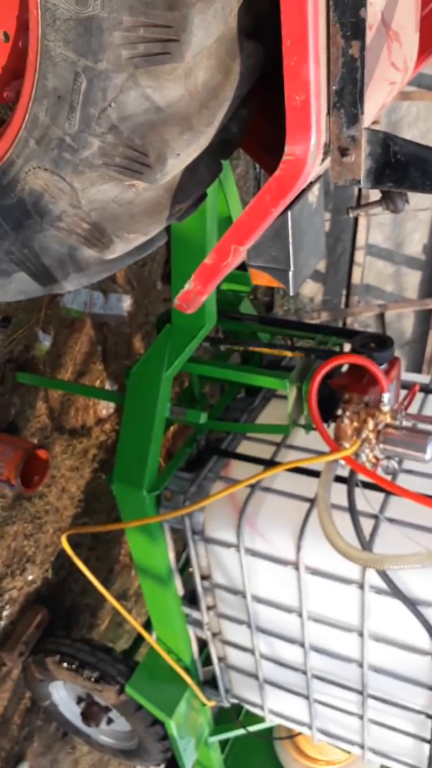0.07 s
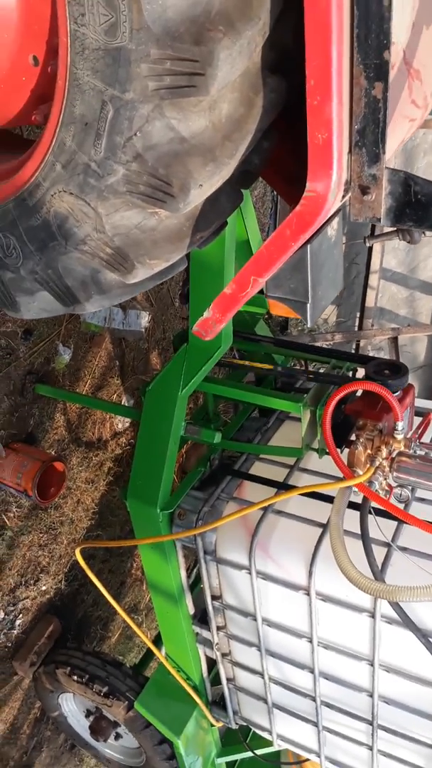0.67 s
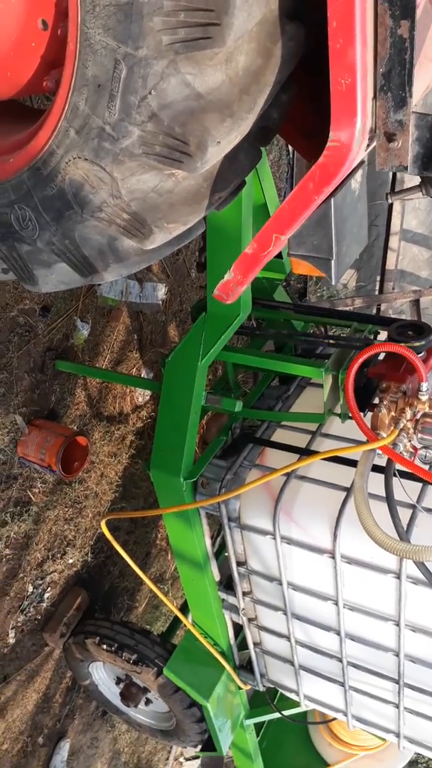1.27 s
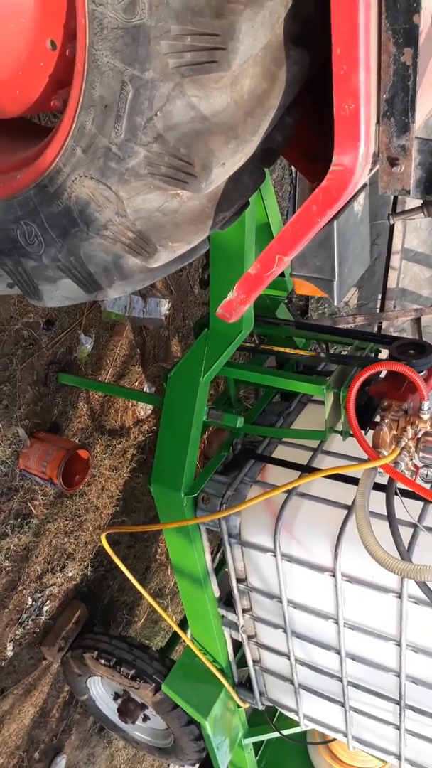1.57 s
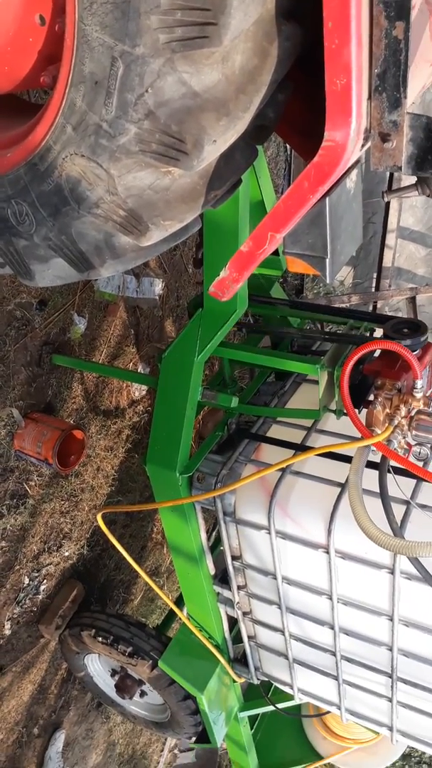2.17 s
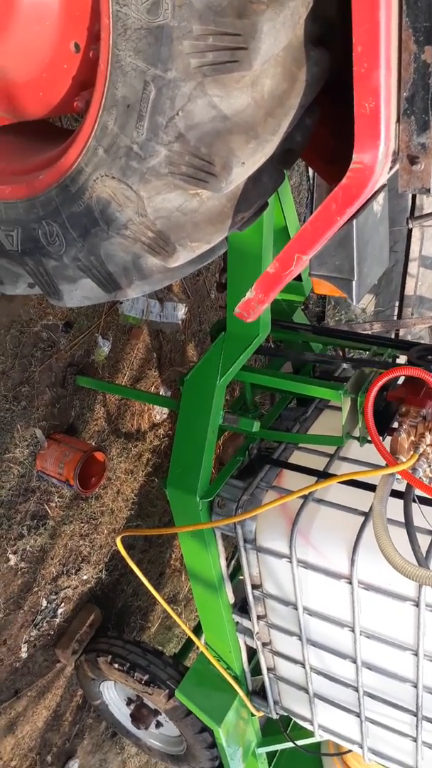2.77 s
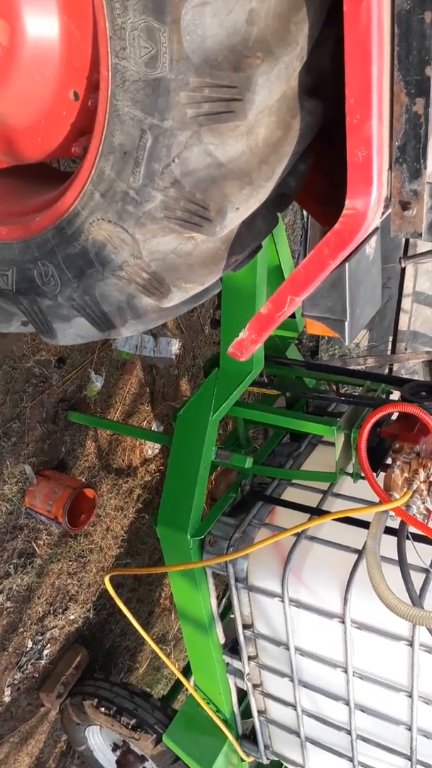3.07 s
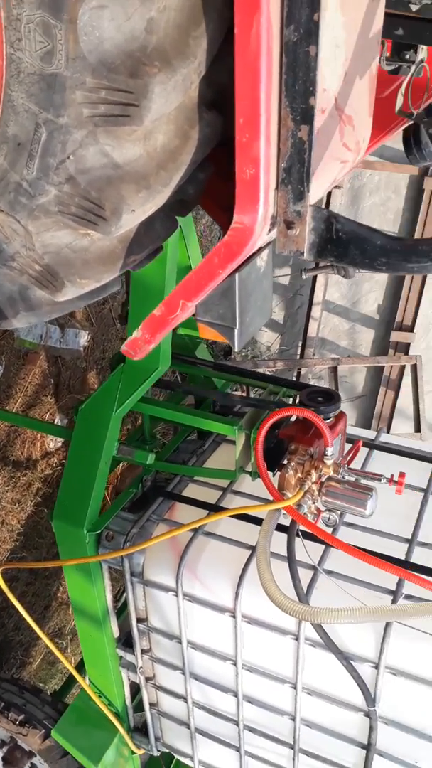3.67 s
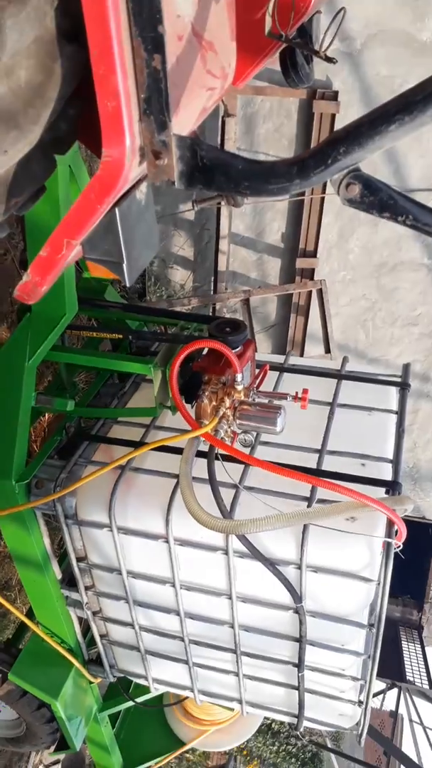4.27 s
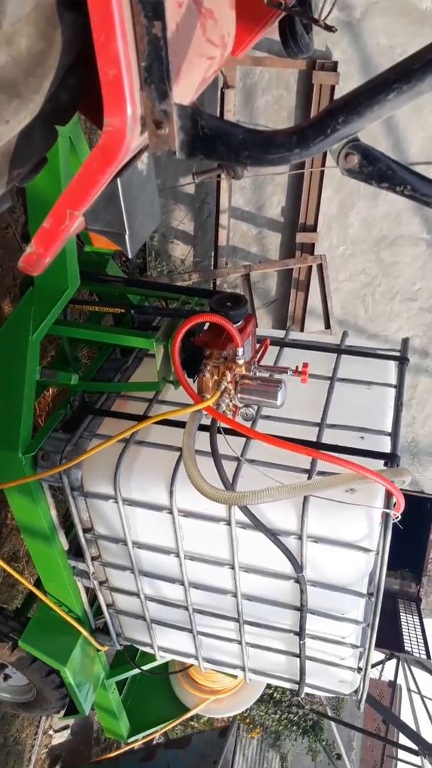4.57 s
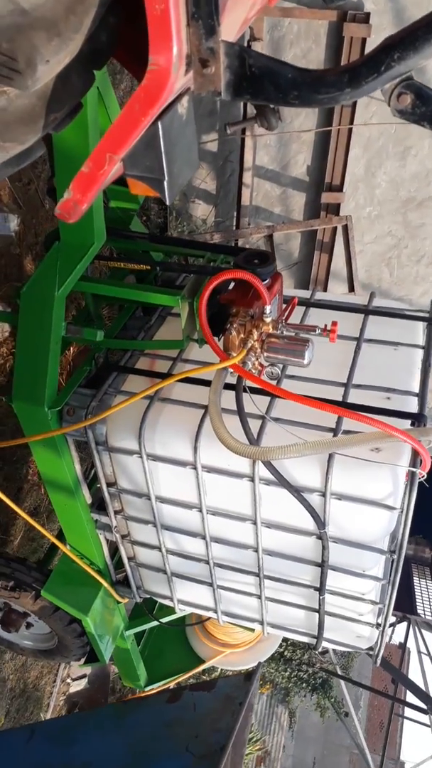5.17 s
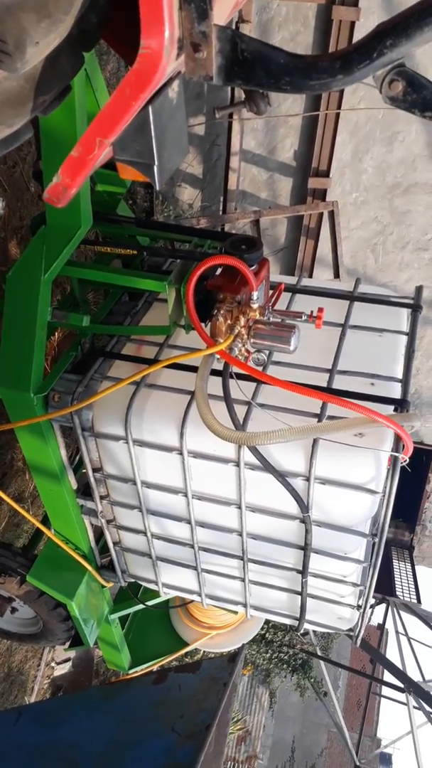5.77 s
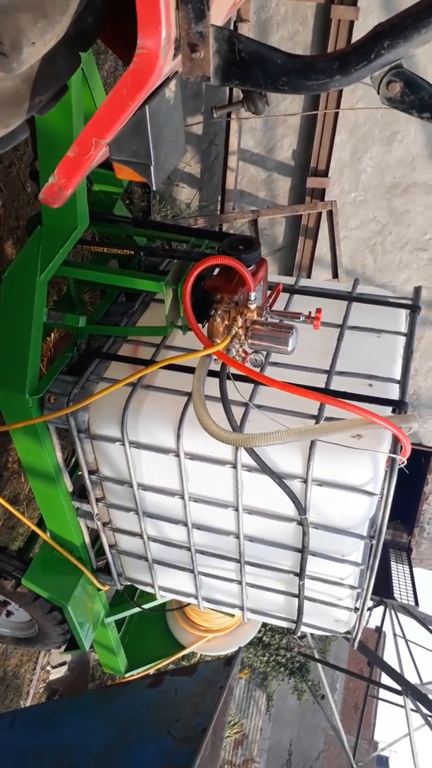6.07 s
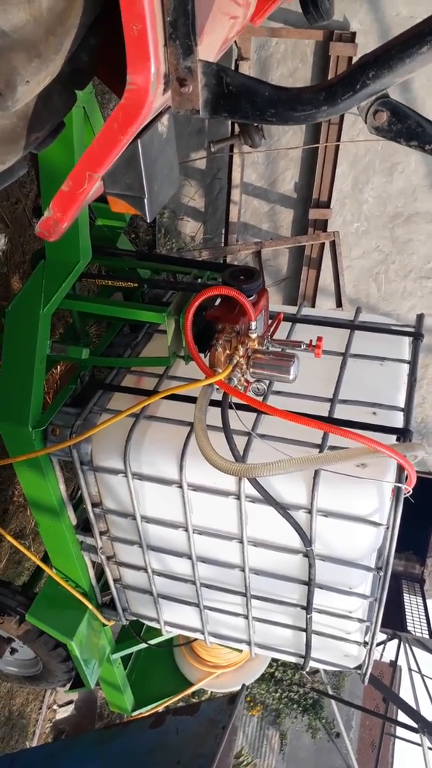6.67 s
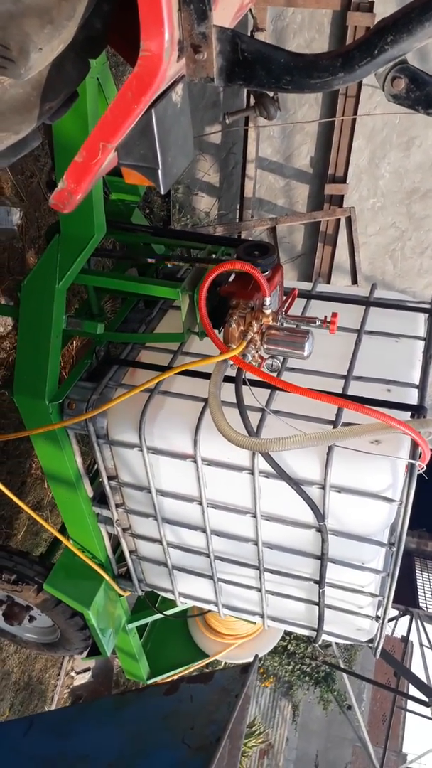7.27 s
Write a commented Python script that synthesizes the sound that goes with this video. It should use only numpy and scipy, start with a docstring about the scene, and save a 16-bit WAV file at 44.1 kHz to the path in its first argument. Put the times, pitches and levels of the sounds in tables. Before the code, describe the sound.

Fast, shrill, rhythmic squeaks and dull knocks over a clattering tractor engine; the squeaking drops out, the engine swells, and it starts again.

```python
"""A three-cylinder tractor diesel runs fast and drives a sprayer pump, heard from close by in a yard.
A dry spot in the pump drive rubs once a turn, ten times a second: a falling chirp, a lower squeak, a rasp, often a dull knock.
The rubbing stops for a while; the recorder's gain control then lets the engine swell until the chirps return."""
import sys
import numpy as np
from scipy import signal
from scipy.fft import rfft, irfft, next_fast_len
from scipy.io import wavfile
from scipy.ndimage import uniform_filter1d, minimum_filter1d

SR = 44100
rng = np.random.default_rng(int(sys.argv[2]) if len(sys.argv) > 2 else 0)


def to_wav(s):
    """Save 16-bit WAV."""
    ch = np.atleast_2d(s).T  # columns
    pcm = np.round(np.clip(ch, -1, 1) * 32767)  # PCM
    wavfile.write(sys.argv[1], SR, pcm.astype(np.int16))


N = 323253

# partials of the stick-slip: (multiple of the chirp pitch, dB, delay s, phase wobble rad); the slip doubles its period unsteadily
PARTIALS = [(1 / 2, -7.5, 0.0035, 0.8), (1, 0, 0.001, 0.3), (3 / 2, -14, 0.005, 0.6), (2, -18.3, 0.001, 1), (5 / 2, -23.5, 0.0027, 1.6)]   # fixed
# long irregular squeaks as the rubbing lets go or catches again: (s, length s, start Hz, end Hz, dB, rasp dB)
SQUEAKS = [(2.984, 0.025, 4230, 3940, 3, -0.5), (3.994, 0.023, 5930, 5530, 5, -30), (4.03, 0.031, 6174, 5720, -4, -36), (6.755, 0.049, 6020, 5450, -15, -39), (6.804, 0.0173, 4210, 4380, -10.5, -18), (6.826, 0.0258, 5410, 4280, -5, -3), (6.854, 0.0152, 3090, 3200, 5, -10.5)]
# resonances that the rasp excites: (Hz, width Hz, dB, age at the top s, spread s)
RASP = [(1206, 300, -12, 0.07, 0.0081), (1830.6, 140, 0, 0.0676, 0.00895), (2130, 330, -5, 0.072, 0.018), (2630, 240, -1.5, 0.069, 0.014), (2596, 520, -2.5, 0.024, 0.011), (3250, 430, -3.5, .056, 0.017), (3940, 250, -6.5, 0.0557, 0.0159), (4373, 460, -5.5, 0.055, 0.01615), (5190, 390, -8.5, 0.049, 0.018), (6200, 710, -7.5, 0.021, 0.016), (7840, 1500, -7.5, 0.055, .013), (12200, 1600, -23, 0.058, 0.009)]
# hiss of the rubbing: (Hz, dB per Hz)
HISS = [(600, -9.5), (1200, -1.5), (1500, 3.5), (2800, -2), (6000, -7.5), (9200, -15), (10100, -47), (14000, -25), (16000, -32)]
# the hardest knocks of the drive: (s, peak dB, pitch Hz)
KNOCKS = [(0.574, -15.5, 186), (0.774, -11.5, 290), (0.866, -11, 270), (0.967, -9, 205), (1.151, -14, 371),
          (2.108, -12, 143), (2.477, -11.5, 127), (2.674, -12.5, 162), (2.768, -11.5, 110), (2.869, -11.5, 350),
          (3.433, -14, 127), (3.539, -8, 151), (3.924, -11, 255), (6.987, -9, 296)]
# engine: (s, firings per s)
SPEED = [(0, 36.6), (5.9, 36.63), (6.6, 36.3), (7.33, 36.5)]   # fixed
# exhaust note: (multiple of the firing rate, dB rms)
EXHAUST = [(1, -55), (2, -37), (3, -26.5), (4, -39), (5, -29.5), (7, -28.5), (8, -38), (9, -42)]   # fixed
# gear and accessory whines at mean speed: (Hz, dB rms)
WHINES = [(495.3, -32.5), (576.0, -33), (818.3, -36.5), (990.5, -37), (1357, -45), (1540, -39), (1577, -33),
          (1841, -56), (2013, -33)]
# combustion clatter: (Hz, dB per Hz)
CLATTER = [(300, -1), (550, -4.5), (850, -4), (1100, -0.5), (1350, 2), (2050, -1.5), (2800, -9), (3800, -19.5), (6000, -23), (8600, -22), (10800, -51.5), (12300, -48), (12700, -36), (16000, -38)]
# rumble of block and frame: (Hz, dB per Hz)
RUMBLE = [(25, -28), (50, -25), (75, -11.5), (120, 0.5), (220, 0), (310, 4.5), (430, -1.5), (600, 2), (1000, -18), (2500, -39.5)]
STRONG_FIRING_S = 5.507   # fixed
CUTOFF_HZ = 15720   # fixed
T = np.arange(N) / SR
TURNS_PER_S = 10.487   # fixed
# spells in which the dry spot rubs on every turn: (first rub s, until s, chirp dB, rasp dB)
SPELLS = [(-0.002, 2.9, 9.8, 4), (3.05, 3.9673, 9, 3.5), (4.02, 4.07, 1.5, -27), (6.888, 7.32, 8.2, 3.6)]
# how the dry spot grips as time goes by: (s, settled chirp pitch Hz, fall of the chirp Hz, lead-in squeak dB, low squeak Hz, low squeak dB)
GRIP = [(0, 6096, 336.3, -22, 3510, -4.5), (0.9, 6103, 362, -14, 3500, -5), (1.45, 5950, 525, -0.5, 3904, -9), (1.8, 5970, 435, -4, 4164, -7.5),
        (2.05, 5930, 481.3, -14, 4180, -2.5), (2.8, 5866, 540, -17, 4011, -3), (3.15, 5976, 401, -19.5, 4110, 1.5), (3.9, 5764, 501, -16, 4193, 1),
        (6.9, 5817, 397, -16, 4470, -12), (7.3, 5900, 370.6, -15, 4500, -3.5)]
# every chirp swells, holds with a slight sag, drops as the grip breaks and then fades
ATTACK_S, ATTACK_DB_PER_S = 0.0021, 3300
HOLD_S, SAG_DB_PER_S = 0.027, 138
BREAK_S, BREAK_DB, FADE_DB_PER_S = 0.0092, 3, 299.5
GLIDE_S = 0.01474   # time in which the pitch settles
# shudder of the frame under the rubbing: (Hz, dB per Hz)
SHUDDER = [(30, -26), (55, -10), (80, 2.5), (130, 5), (250, 1), (600, 1), (900, -5.5), (1500, -1), (2500, -21.5)]


def from_db(db):
    """Decibels to gain."""
    return 10 ** (np.asarray(db) / 20)


def rms_one(x):
    """Scale to unit rms."""
    return x / np.sqrt(np.mean(x ** 2) + 1e-20)


def drift(rate, size=N):
    """Smooth chance of spread 1 that changes about rate times a second."""
    steps = np.arange(size) / SR * rate
    return 1.473 * np.interp(steps, np.arange(size // 8 + 2), rng.standard_normal(size // 8 + 2))


def colour(x, spectrum):
    """Give x a spectrum; rms 1."""
    hz, db = np.transpose(spectrum)
    size = next_fast_len(N)
    bins = np.maximum(np.arange(size // 2 + 1) * SR / size, 1)
    return rms_one(irfft(rfft(x, size) * from_db(np.interp(np.log(bins), np.log(hz), db, left=-60)), size)[:N])


def band(x, hz, width_hz):
    """A steep resonance."""
    edges = np.clip([hz - width_hz / 2, hz + width_hz / 2], 20, .45 * SR)  # fixed
    return signal.sosfilt(signal.butter(2, edges, "band", fs=SR, output="sos"), x)


def add(out, start_s, sound):
    """Mix a sound in at a time."""
    at = int(round(start_s * SR))
    sound = sound[max(-at, 0):N - at]
    out[max(at, 0):max(at, 0) + len(sound)] += sound


def swell(s, spread):
    """A bell-shaped rise and fall around a moment."""
    return np.exp(-.5 * (s / spread) ** 2)


def slip_phase(hz, jitter):
    """Phase of a stick-slip vibration whose pitch trembles with the grip."""
    tremble = .5 * drift(260, size=len(hz)) + drift(2200, size=len(hz))  # fixed
    return 2 * np.pi * (np.cumsum(hz * (1 + jitter * tremble)) / SR + rng.random())


def squeak(length, start_hz, end_hz, jitter, octave_db=-19, stutter_db=2.5):
    """A short rough glide with a weak octave; the grip stutters."""
    size = int(length * SR)
    phase = slip_phase(np.linspace(start_hz, end_hz, size), jitter)
    grip = signal.windows.tukey(size, .4) * rms_one(from_db(stutter_db * (drift(185.2, size=size) + .5 * drift(910, size=size))))
    return np.sqrt(2) * grip * (np.sin(phase) + from_db(octave_db) * np.sin(2 * phase))


def chirps(rubs, chirp_db=0.52, jitter=0.01, flutter_db=2.5, lead_db=-2, low_db=-1, low_fall=0.0602, groan_db=-0.8):
    """Each rub: a lead-in, a loud falling chirp, then drops to lower, rougher modes as the grip fades."""
    out, age = np.zeros(N), np.arange(-SR // 160, SR // 12) / SR
    for s, db, settled_hz, fall_hz, lead, low_hz, low, rasp_db in rubs:
        phase = slip_phase(settled_hz + fall_hz * np.exp(-np.maximum(age - ATTACK_S, 0) / GLIDE_S), jitter)
        for multiple, partial_db, delay, wobble in PARTIALS:
            level = db + chirp_db + partial_db + chirp_course(age - delay) + flutter_db * drift(242, size=len(age))
            add(out, s + age[0], np.sqrt(2) * from_db(level) * np.sin(multiple * phase + wobble * drift(401.0, size=len(age))))
        add(out, s - .012, from_db(db + lead + lead_db) * squeak(0.015, 5550, 5687, jitter=0.035))
        low_mode, groan_mode = 1 + 0.0405 * rng.standard_normal(2)
        add(out, s + .038, from_db(rasp_db + low + low_db) * squeak(0.0274, low_hz * low_mode * (1 + low_fall), low_hz * low_mode * (1 - low_fall), jitter=0.021))
        add(out, s + rng.uniform(.05, .062), from_db(rasp_db + groan_db) * squeak(0.0215, 3500 * groan_mode, 2400 * groan_mode, jitter=0.024))
    for s, length, start_hz, end_hz, db, _ in SQUEAKS:
        add(out, s, from_db(db) * squeak(length, start_hz, end_hz, jitter=.021))  # fixed
    return out


def rubbing(rubs, top_s, spread_s):
    """Strength of the dry sliding that follows every squeal, with its top at a given age."""
    out, age = np.zeros(N), np.arange(SR // 8) / SR
    for s, *_, db in rubs:
        add(out, s, from_db(db) * swell(age - top_s, spread_s))
    for s, length, *_, db in SQUEAKS:
        add(out, s, from_db(db) * swell(age - length + 0.057 - top_s, spread_s))
    return out


def rasp(rubs, grain_db=2.5, hiss_db=-8):
    """Uneven micro-slips shake the resonances of the drive and hiss."""
    grain = rms_one(from_db(grain_db * drift(420)))
    out = from_db(hiss_db) * rubbing(rubs, 0.044, 0.0326) * colour(grain * rng.standard_normal(N), HISS)
    for hz, width_hz, db, top_s, spread_s in RASP:
        out += from_db(db) * rubbing(rubs, top_s, spread_s) * rms_one(band(grain * rng.standard_normal(N), hz, width_hz))
    return out


def knocks(rubs, knock_db=17.7, light_hz=170, decay_s=0.0058, light_db=-11, clack_db=-3, clack_hz=450, clack_s=0.0046):
    """Heavily damped thuds with a short clack; every rub also jolts the frame lightly, twice."""
    out, age = np.zeros(N), np.arange(SR // 25) / SR
    jolts = [(s + lag_s + rng.normal(0, 0.002), db + light_db + rng.normal(0, 3.06), light_hz * np.exp(0.38 * rng.standard_normal()))
             for s, db, *_ in rubs for lag_s in (0.009, 0.021)]
    for s, db, hz in [(s, db + knock_db, hz) for s, db, hz in KNOCKS] + jolts:
        thud = np.sin(2 * np.pi * hz * age) * np.exp(-age / decay_s)
        clack = rms_one(band(rng.standard_normal(len(age)), clack_hz, clack_hz * 1.35)) * np.exp(-age / clack_s)
        add(out, s, from_db(db) * (thud + from_db(clack_db) * clack))
    return signal.sosfilt(signal.butter(2, 65, "high", fs=SR, output="sos"), out)


def engine(clatter_db=-18.5, rumble_db=-24, whine_db=-.5, between=0.4, ring_s=0.0051, rise_s=0.0037, throb=0.22, waver_db=0.3):
    """Three cylinders fire in turn, each with its own knock, over the exhaust note and gear whine."""
    rate = np.interp(T, *np.transpose(SPEED))
    firings = np.cumsum(rate) / SR
    firings = firings - np.interp(STRONG_FIRING_S, T, firings)
    age = firings % 1 / rate
    cylinder = from_db([5.5, 4.5, 0.5])[np.floor(firings).astype(int) % 3]  # fixed
    blows = between + cylinder * (1 - np.exp(-age / rise_s)) * np.exp(-age / ring_s)
    # much of the rattle comes back alike in every engine cycle, the rumble more than the clatter
    size = SR // 12
    place = (firings / 3 % 1 * size).astype(int) % size  # fixed
    alike = np.array([[.5], [.65]])  # fixed
    rattle = np.sqrt(alike) * rng.standard_normal((2, size))[:, place] + np.sqrt(1 - alike) * rng.standard_normal((2, N))
    out = from_db(clatter_db) * colour(blows * rattle[0], CLATTER) + from_db(rumble_db) * colour(blows ** throb * rattle[1], RUMBLE)
    tones = [(round(k), db) for k, db in EXHAUST] + [(hz / rate.mean(), db + whine_db) for hz, db in WHINES]
    for multiple, db in tones:
        out += np.sqrt(2) * from_db(db + waver_db * drift(14)) * np.sin(2 * np.pi * (multiple * firings + rng.random()))
    return out


def yard(x, echo_db=-22, fade_s=0.04):
    """Short echoes from tyre, tank, ground and walls."""
    out = x.copy()
    for lag in rng.uniform(.003, .11, size=60):
        add(out, lag, x * (from_db(echo_db) * np.exp(-lag / fade_s) * rng.choice([-1, 1])))
    return out


def turns(timing_s=0.001, level_db=0.7723, pitch_share=0.00597, fall_share=0.151, squeak_db=3.0):
    """One rub per turn, each a little different: (s, chirp dB, settled Hz, fall Hz, lead-in dB, low squeak Hz, low squeak dB, rasp dB)."""
    rubs, (times, *grip) = [], np.transpose(GRIP)
    for first_s, until_s, chirp_db, rasp_db in SPELLS:
        for s in np.arange(first_s, until_s, 1 / TURNS_PER_S):
            hz, fall_hz, lead_db, low_hz, low_db = (np.interp(s, times, column) for column in grip)
            usual = np.array([s, chirp_db, hz, fall_hz, lead_db, low_hz, low_db, rasp_db])
            scatter = np.array([timing_s, level_db, pitch_share * hz, fall_share * fall_hz, squeak_db, 0, squeak_db, level_db])
            rubs.append(usual + scatter * rng.standard_normal(len(usual)))
    return rubs


def chirp_course(age):
    """Level of a chirp in dB: attack, sagging hold, break, fade."""
    held, released = np.maximum(age - ATTACK_S, 0), np.maximum(age - HOLD_S, 0)
    return (-ATTACK_DB_PER_S * np.maximum(ATTACK_S - age, 0) - SAG_DB_PER_S * held
            - BREAK_DB * np.minimum(released / BREAK_S, 1) - FADE_DB_PER_S * released)


def shudder(rubs, shudder_db=-15):
    """The dragging shaft keeps the frame rumbling for as long as it rubs."""
    return from_db(shudder_db) * rubbing(rubs, 0.074, 0.0411) * colour(rng.standard_normal(N), SHUDDER)


def limiter(x, ceiling_db=-10.5, hold_s=0.072, smooth_s=0.0097):
    """A quick second stage takes off what is still too loud, and pushes the engine under the chirps."""
    level = 10 * np.log10(np.abs(uniform_filter1d(x ** 2, SR // 25)) + 1e-9)
    size = int(hold_s * SR) // 2 * 2 + 1
    cut = -minimum_filter1d(-np.maximum(level - ceiling_db, 0), size, origin=size // 2, mode="nearest")
    r = np.exp(-1 / (smooth_s * SR))
    return x * from_db(-signal.lfilter([1 - r], [1, -r], cut, zi=[r * cut[0]])[0])


def scene():
    """The rubbing drive in front of the engine."""
    rubs = turns()
    return (yard(chirps(rubs) + rasp(rubs)) + knocks(rubs) + shudder(rubs) + engine())[None]


def gain_control(x, ceiling_db=-10.0, hold_s=0.59, attack_s=0.0013, release_s=0.098, presence_share=1.44, presence_release_s=0.193):
    """Loud sound pulls the gain down; it is held, then comes back. The presence band is cut deeper and longer."""
    level = 10 * np.log10(np.abs(uniform_filter1d(x ** 2, SR // 25)) + 1e-9)
    size = int(hold_s * SR) // 2 * 2 + 1
    wanted = np.clip(level - ceiling_db, 1e-3, 13)  # fixed
    held = -minimum_filter1d(-wanted, size, origin=size // 2, mode="nearest")
    presence = signal.sosfiltfilt(signal.butter(2, [1150, 3100], "band", fs=SR, output="sos"), x)
    r, out = np.exp(-1 / (attack_s * SR)), 0
    for part, share, release in [(x - presence, 1, release_s), (presence, presence_share, presence_release_s)]:
        cut = share * np.exp(np.maximum.accumulate(np.log(held) + T / release) - T / release)
        out = out + part * from_db(-signal.lfilter([1 - r], [1, -r], cut, zi=[r * cut[0]])[0])
    return out


def record(dry):
    """Gain control, limiter, rounded peaks, and the top cut off."""
    x = limiter(gain_control(dry[0]))
    x = x / (1 + x ** 8) ** (1 / 8)  # fixed
    return signal.sosfilt(signal.ellip(10, .1, 80, CUTOFF_HZ, fs=SR, output="sos"), x)[None]


dry = scene()
out = record(dry)
to_wav(out)
```